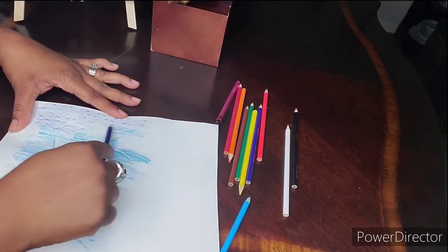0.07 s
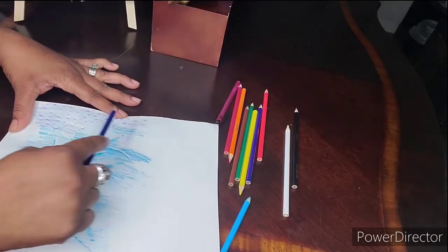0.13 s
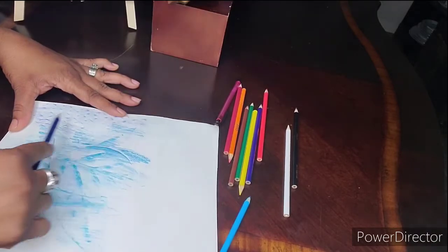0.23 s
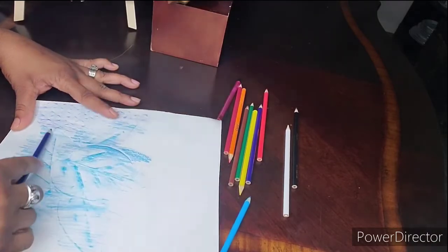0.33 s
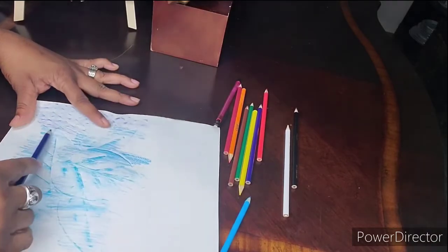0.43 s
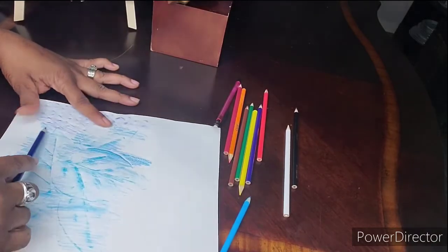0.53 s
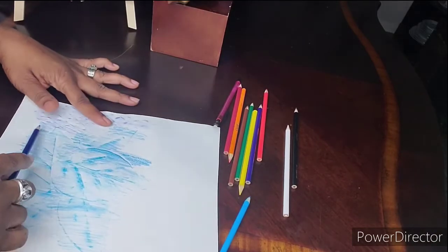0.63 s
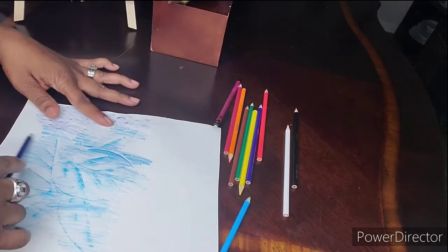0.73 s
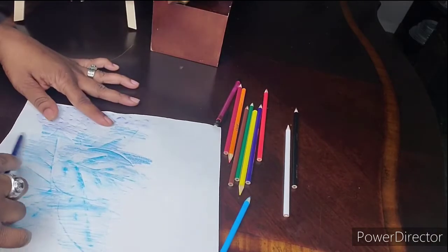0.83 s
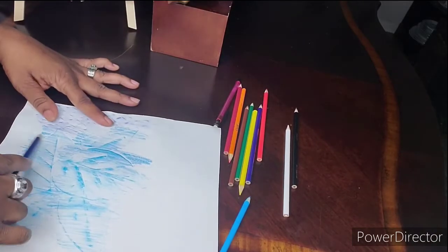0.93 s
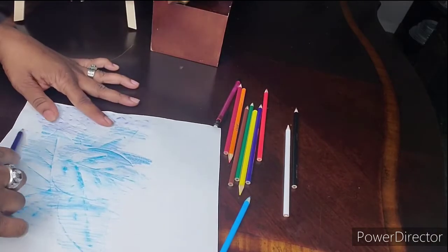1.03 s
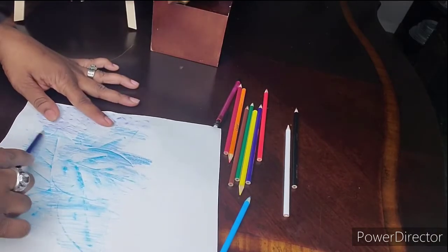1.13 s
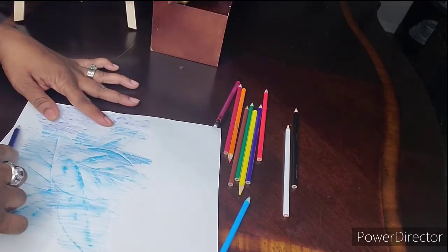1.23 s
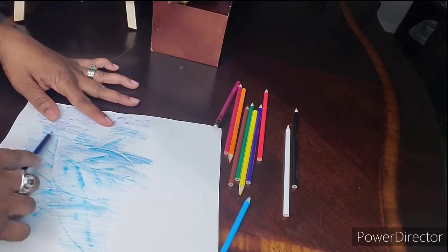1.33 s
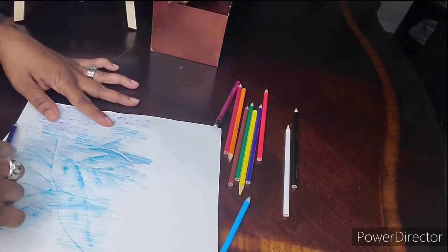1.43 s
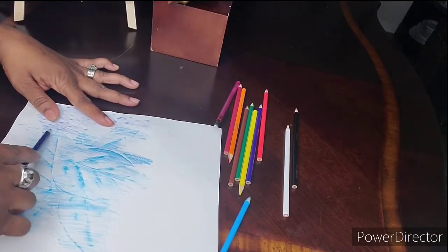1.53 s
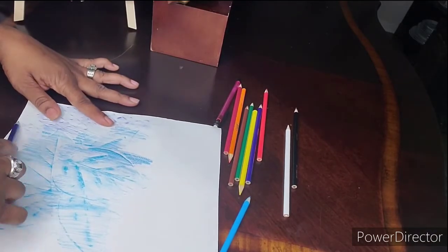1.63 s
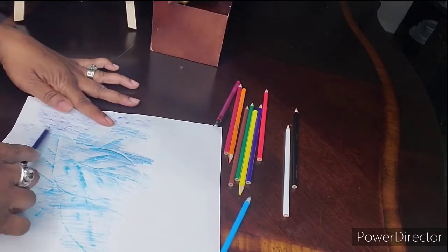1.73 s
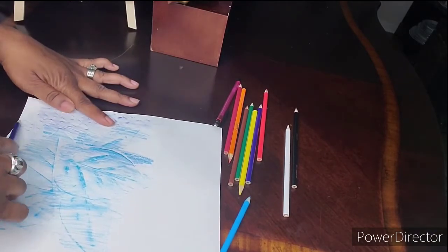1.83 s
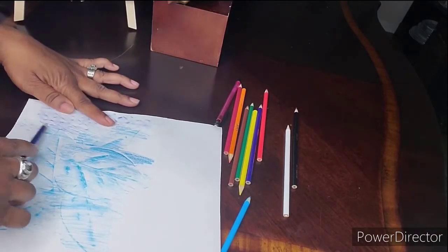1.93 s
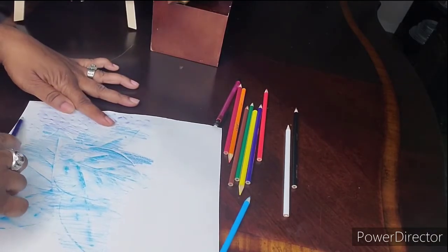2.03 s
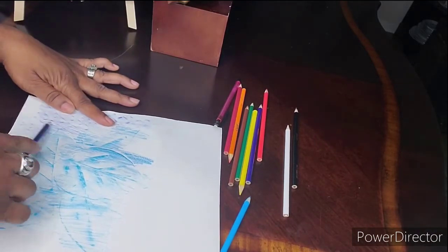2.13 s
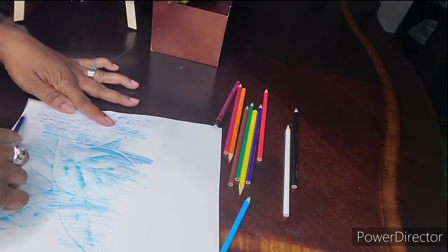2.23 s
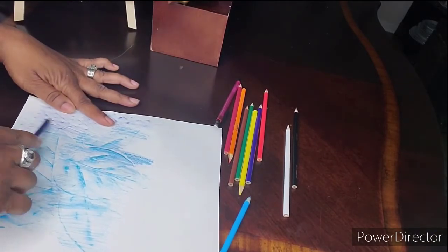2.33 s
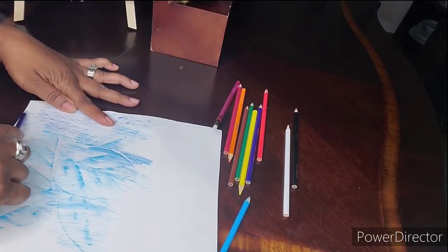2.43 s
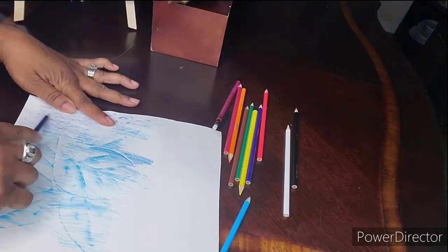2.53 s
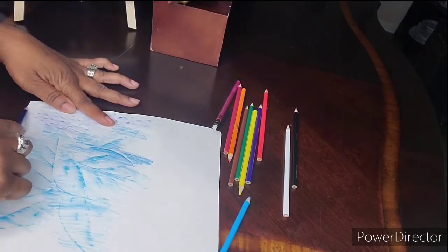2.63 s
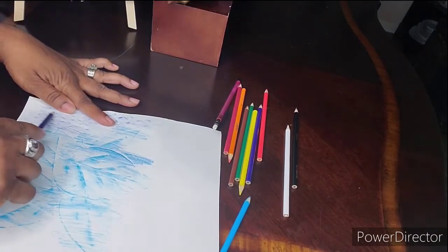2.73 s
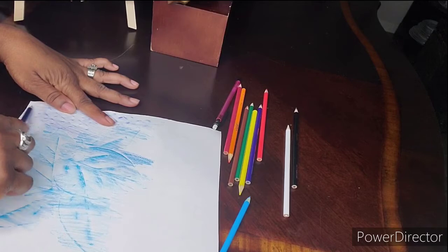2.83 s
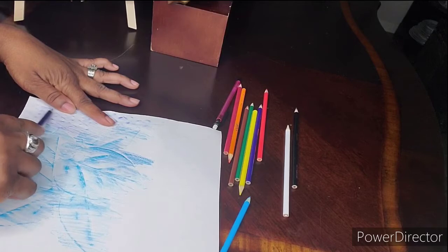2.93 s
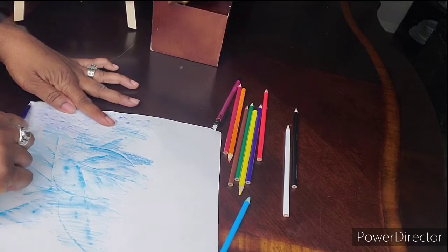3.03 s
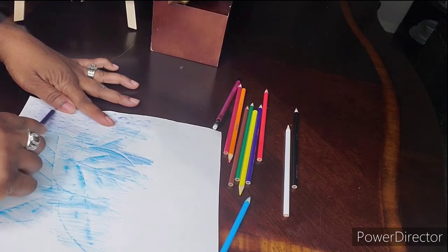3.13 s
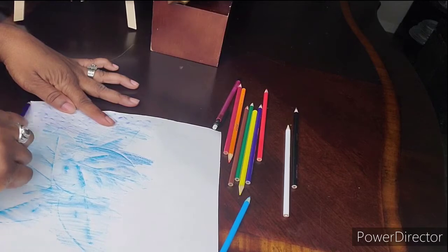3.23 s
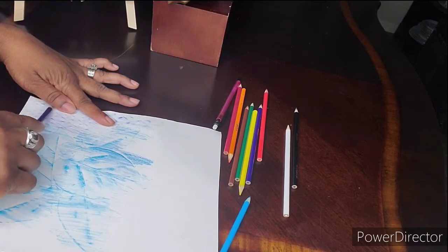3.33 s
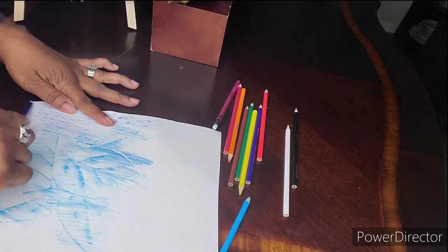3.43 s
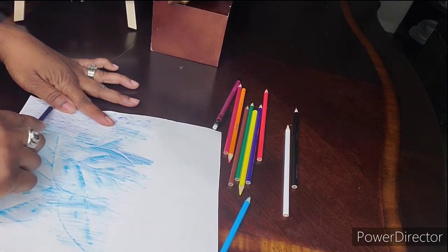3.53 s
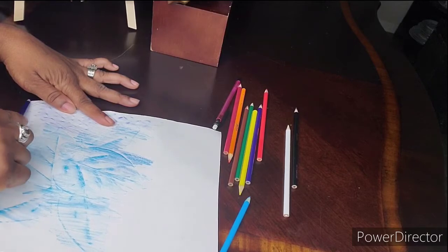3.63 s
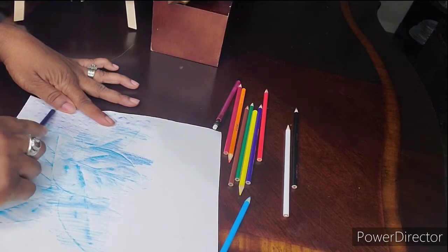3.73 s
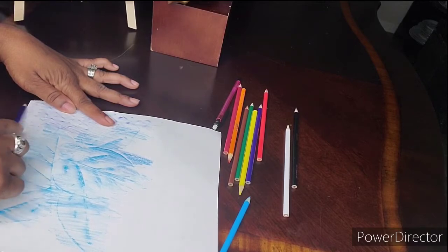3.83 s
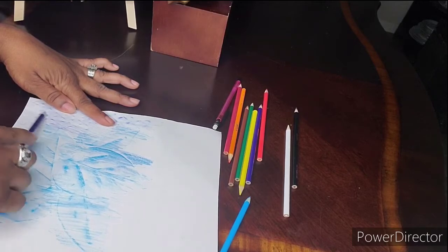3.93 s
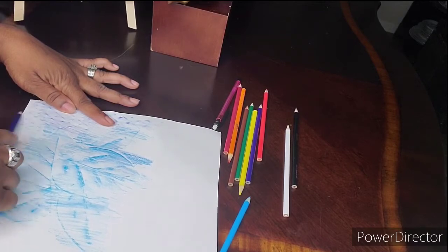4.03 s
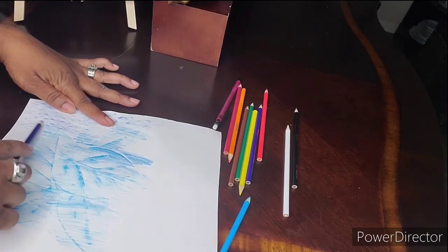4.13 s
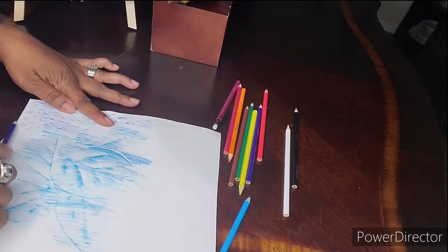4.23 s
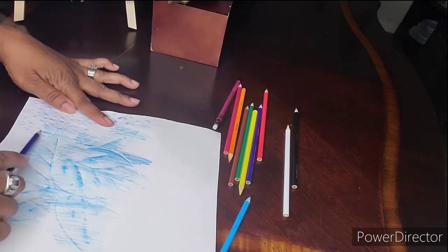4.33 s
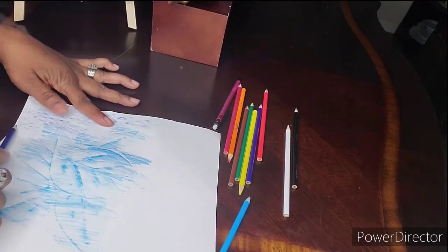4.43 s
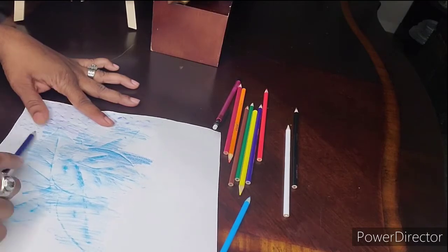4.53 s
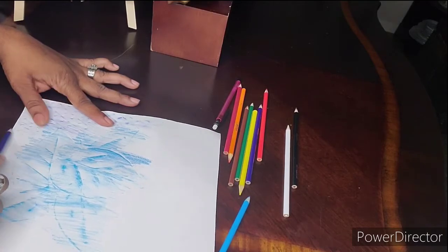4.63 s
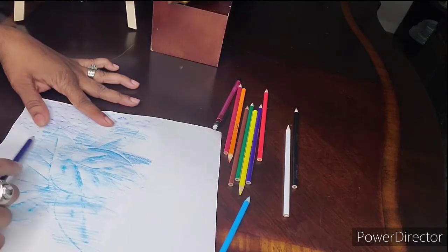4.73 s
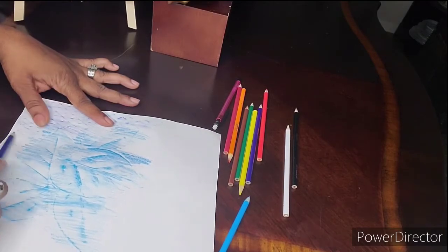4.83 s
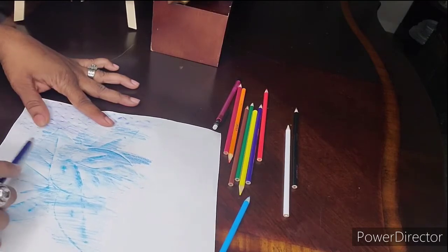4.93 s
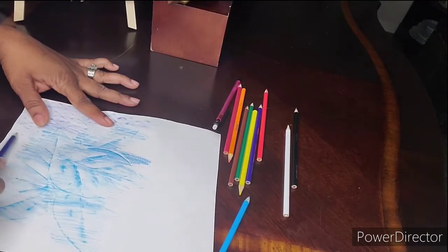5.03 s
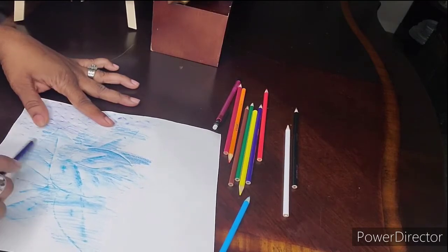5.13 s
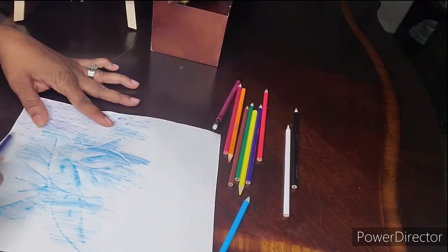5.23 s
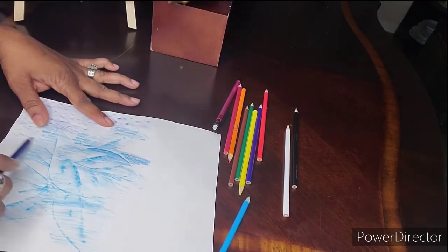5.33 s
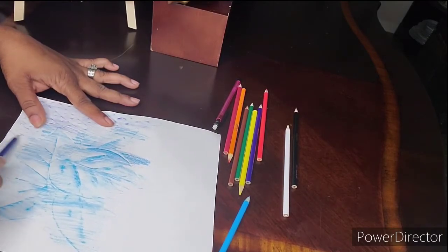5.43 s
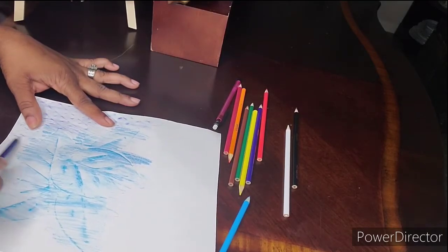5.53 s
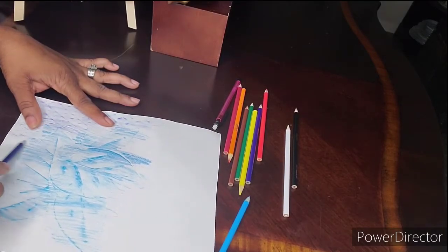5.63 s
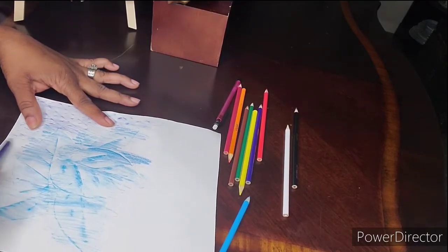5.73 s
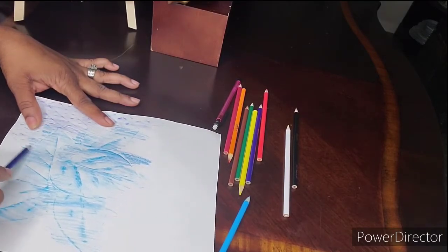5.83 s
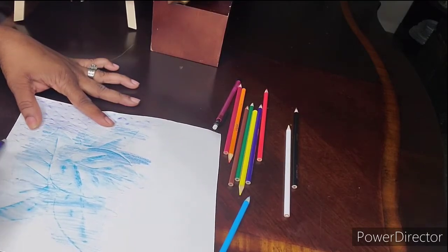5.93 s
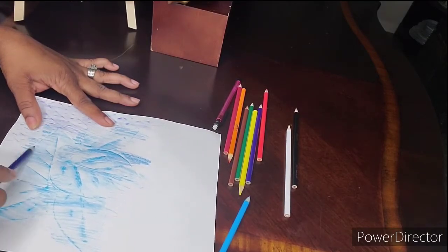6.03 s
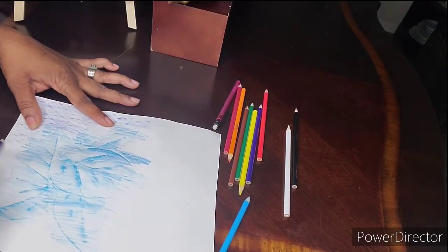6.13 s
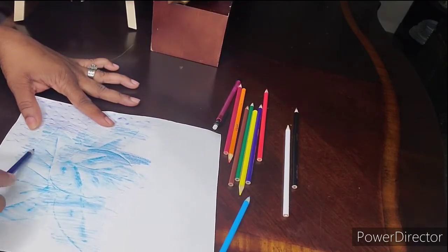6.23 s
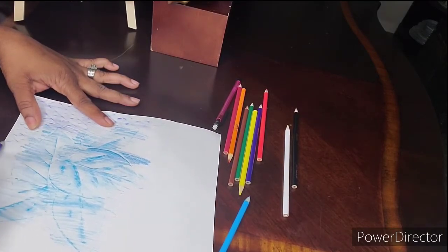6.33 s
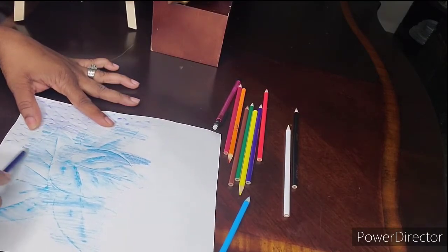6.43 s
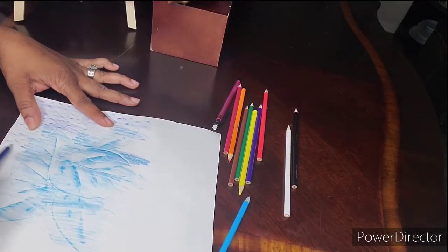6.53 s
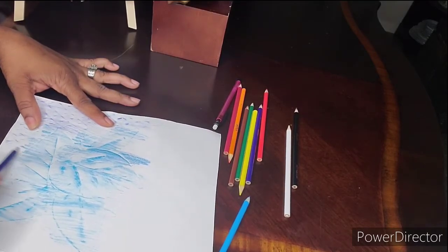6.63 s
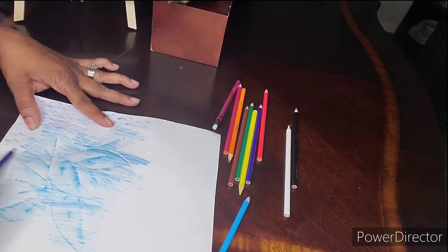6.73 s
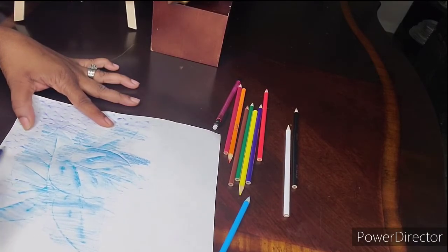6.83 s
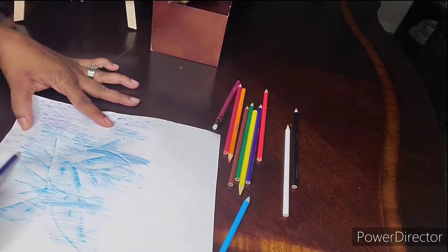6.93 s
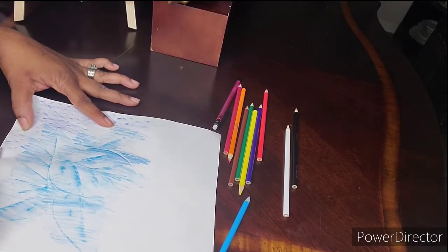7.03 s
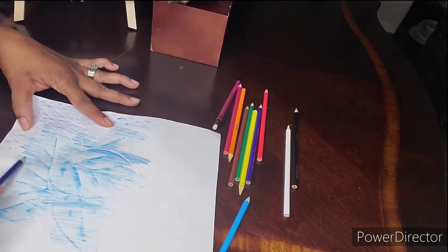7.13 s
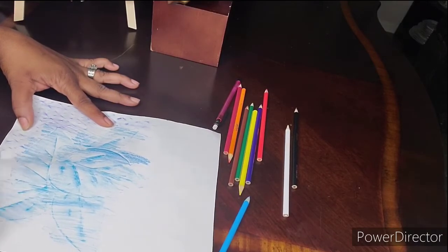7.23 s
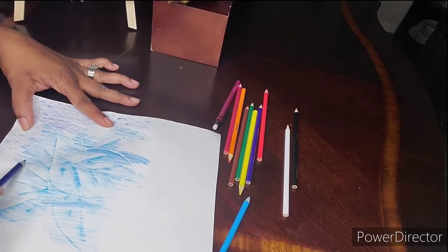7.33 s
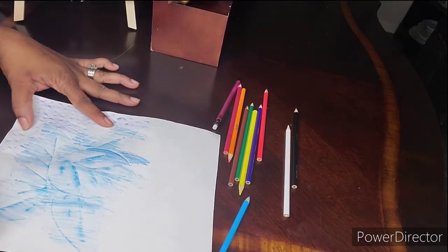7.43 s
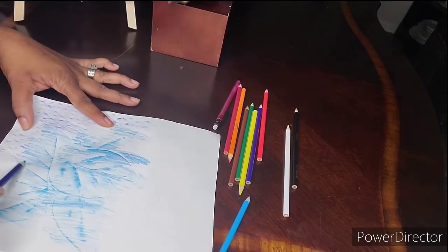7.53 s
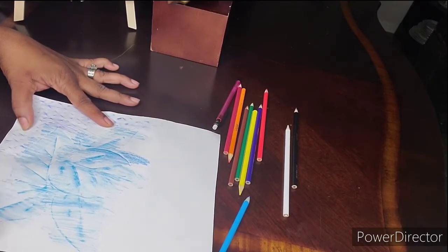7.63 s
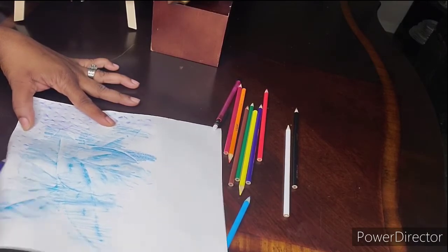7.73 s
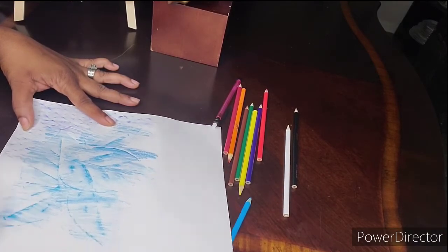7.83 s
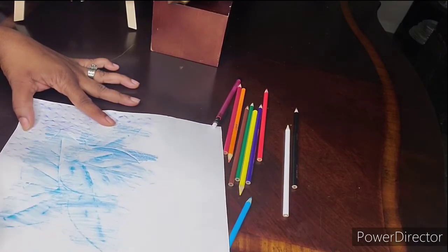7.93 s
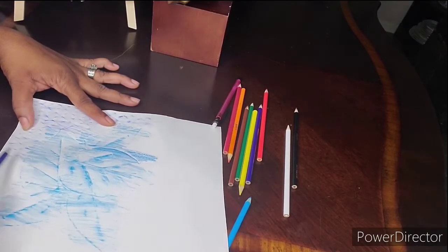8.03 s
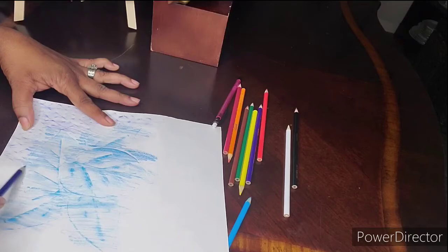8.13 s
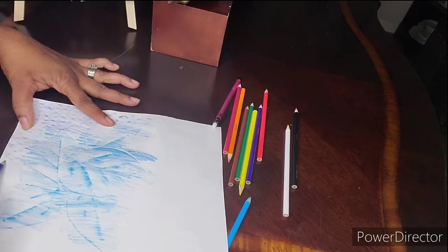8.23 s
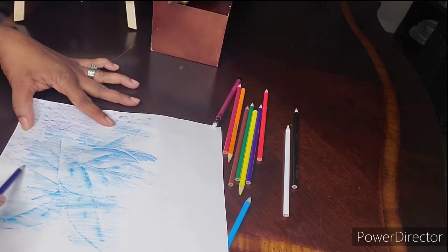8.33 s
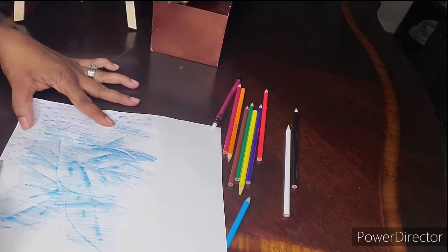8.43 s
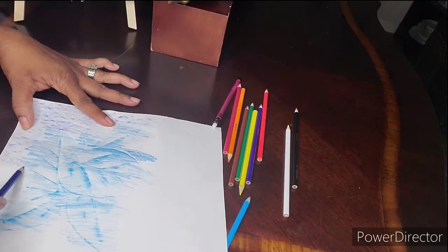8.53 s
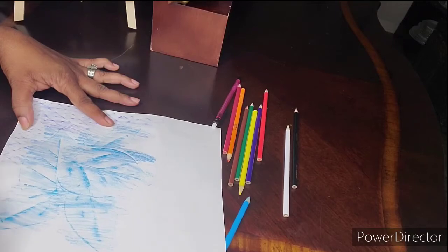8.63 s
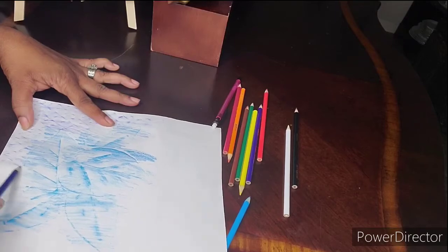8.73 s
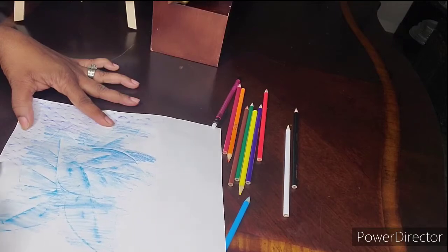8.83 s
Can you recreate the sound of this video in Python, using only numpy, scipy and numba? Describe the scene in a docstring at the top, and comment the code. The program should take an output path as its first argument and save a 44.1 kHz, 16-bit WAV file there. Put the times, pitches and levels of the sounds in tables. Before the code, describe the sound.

In a small quiet room with barely audible air noise, close stereo microphones catch a colored pencil on paper over a wooden desk. From 0 to 0.25 s come abrupt dry scratches and sharp snaps, the strongest near 0.2 s, with a papery scrape and soft bump. Faint searching touches follow until about 0.9 s. Light shading then begins and firms up by 1.5 s into steady back-and-forth rubbing, roughly five full swings or ten strokes each second, pushes mostly louder than returns. Bright gritty hiss sits over midrange sheet rustle and muted desk patter; irregular ticks snap as the lead crosses ridges, especially from 2 to 4.3 s and after 5.6 s. Around 7.9 to 8.05 s the rhythm breaks with hollow paper scrapes and a strong snap. After a brief lull and small scrapes, softer strokes resume near 8.3 s, growing until the end.

```python
"""A few scratches and sharp snaps, then a coloured pencil shades back and forth, about ten strokes a second.
The paper lies on a ridged surface on a wooden desk: the lead rubs over the grain and snaps over ridges.
Noise-like slips, crackle and jolts drive three resonant parts: hissing tip, rustling sheet and knocking desk.
The sheet also flexes in short hollow scrapes and the hand bumps the desk.
Two microphone ports pick it all up in a small quiet room with faint air noise."""
import sys
import numpy as np
from scipy import signal
from scipy.fft import rfft, irfft
from scipy.io import wavfile
from scipy.ndimage import uniform_filter1d, map_coordinates
from numba import njit

SR = 44100
rng = np.random.default_rng(int(sys.argv[2]) if len(sys.argv) > 2 else 0)


def master(y):
    """Save y as 16-bit WAV."""
    cut = np.clip(np.atleast_2d(y).T, -1, 1)
    pcm = np.round(cut * 32767)  # scale
    wavfile.write(sys.argv[1], SR, pcm.astype(np.int16))


N = 391608
TIME = np.arange(N) / SR

# lead striking a ridge or landing: (time [s], tip level [dB], sheet level [dB], desk level [dB])
RIDGE_SNAPS = [(0.0738, -57, -43, -68), (0.086, -49, -39.5, -48), (0.162, -39, -34, -66),
               (.179, -53, -42, -66), (0.1929, -31, -26, -63), (0.4762, -42, -56, -49.5),
               (0.4827, -44, -44, -62), (0.633, -34, -41, -48), (0.882, -40.5, -43, -59),
               (1.1643, -40, -47, -72), (1.191, -43, -50, -57), (1.2513, -34.5, -46, -59),
               (1.463, -38, -42, -74), (1.7845, -38, -58, -66), (1.8058, -52, -40.5, -51),
               (2.0619, -38, -46, -51), (2.1313, -29, -36.5, -43.5), (2.138, -37.5, -59, -75),
               (2.1765, -34, -39.5, -46), (2.192, -32, -58, -73), (2.2704, -43, -41, -67),
               (2.2968, -31.5, -46, -73), (2.3124, -30.5, -37, -44.5), (2.4168, -33, -42, -47),
               (2.419, -26.5, -44.5, -51), (2.598, -36, -51, -68), (2.6116, -27.5, -33.5, -45),
               (2.791, -36.5, -38, -46), (2.807, -41, -55, -43), (2.876, -33, -50, -71),
               (2.9799, -38, -45, -73), (3.004, -48, -39, -47.5), (3.098, -39, -60, -78),
               (3.1666, -33, -55, -51), (3.181, -30, -47, -64), (3.2012, -51, -42.5, -50.5),
               (3.278, -44, -50, -67), (3.395, -51, -35.5, -43), (3.552, -38, -48, -53),
               (3.594, -37, -42, -44), (3.651, -32, -56, -74), (3.8434, -37, -49, -58),
               (3.851, -31, -54, -56), (3.8589, -29, -43, -45.5), (3.975, -36, -63, -67),
               (3.9936, -36, -50, -51), (4.052, -42, -58, -54), (4.076, -37, -47, -66),
               (4.112, -41, -53, -72), (4.199, -31, -33.5, -44), (4.306, -36.5, -40.5, -67),
               (4.389, -40, -50, -74), (4.8369, -27, -37.5, -43.5), (5.03, -50, -48, -71),
               (5.2348, -36.5, -62, -51), (5.429, -40.5, -50, -74), (5.6588, -46, -41, -54),
               (5.67, -31.5, -31, -37.5), (5.8906, -28.5, -32.5, -58), (6.1015, -31.5, -38, -47),
               (6.3107, -34.5, -36.5, -48.5), (6.4907, -42, -37, -81), (6.5369, -44, -36.5, -68),
               (6.5432, -37.5, -40, -52.5), (6.711, -48, -43, -60), (6.79, -49, -39.5, -62),
               (6.9498, -35, -37, -49), (6.9816, -32, -35, -49), (7.15, -41.5, -40.5, -79),
               (7.1648, -55, -45, -52), (7.4315, -32.5, -38.5, -52), (7.438, -47, -54, -75),
               (7.4669, -31.5, -33, -48), (7.607, -33.5, -33.5, -77), (7.6325, -51, -36, -53),
               (7.795, -47, -56, -63), (7.8213, -31.5, -31.5, -54), (7.8517, -29.5, -30, -44),
               (7.8565, -28.5, -31.5, -48.5), (7.955, -55, -40, -51.5), (7.991, -33, -58, -64),
               (8.0329, -32.5, -27, -57), (8.4684, -41.5, -50.5, -59), (8.496, -46, -56, -62),
               (8.541, -52, -39, -69), (8.5804, -30.5, -40, -49.5), (8.592, -38, -38.5, -70),
               (8.686, -46, -43, -62)]
# relative colour of each part: (frequency [Hz], level [dB])
TIP_COLOUR = [(3700, -20), (4400, -13.5), (4900, -4.5), (5600, 1), (6400, -1), (7300, 1), (8100, -0.5),
              (9000, -6.5), (10000, -7.5), (11600, -4.5), (13000, -5.5), (14600, -6)]
SHEET_COLOUR = [(700, -33), (950, -34), (1250, -12.5), (1600, -4.5), (2000, -3), (2350, -3.5), (2700, -1.5),
                (3300, -4.5), (4000, -5), (4900, -16)]
DESK_COLOUR = [(55, -8), (100, -6.5), (135, 2.5), (168, -17), (205, 3.5), (270, -4), (350, -2.5), (460, 1),
               (600, -0.5), (820, 4), (1150, 2)]
# the grip changes the pencil's ring: (time [s], lower ring boost [dB], upper ring boost [dB])
GRIP_RINGS = [(0, 2.5, -4.5), (1.0, -1, -6.5), (1.999, -0.5, -4), (2.8, -0.5, -3), (3.6, -4, -3),
              (4.3, -0.5, -5), (5.1, -4.5, -4), (6.2, -3, -5), (7.4, 0, -7.5), (8.8, -1.5, -1)]
RING_LOW_HZ, RING_HIGH_HZ, RING_WIDTH_HZ = 5250, 6800, 1770
# colour difference of the two ports: (frequency [Hz], left minus right [dB])
PORT_COLOUR = [(300, 1), (1300, -2.5), (2200, 0), (3200, 0), (4000, -1), (4800, -10.5), (5600, 0.5),
               (6400, -5.5), (7700, -4.5), (9300, -2.5), (11000, -0.5), (14000, 0.0)]
# relative spectrum of the room's still air: (frequency [Hz], level [dB])
AIR_COLOUR = [(20, -16), (38, 5.5), (55, -5.5), (100, -7), (170, -9), (300, -16.5), (1000, -15),
              (3000, -19), (8000, -30), (15000, -24.5)]
AIR_DB = -73
TOP_HZ = 14500
# sheet sliding and flexing under the hands:
# (loudest time [s], fade [s], centre [Hz], spread [octaves], level [dB])
SHEET_FLEXES = [(0.074, .005, 2050, 0.21, -42), (0.097, 0.016, 3150, 0.09, -46.5),
                (.13, .004, 3320, 0.11, -50), (.18, 0.0078, 3170, .2, -43),
                (.484, 0.0077, 1580, 0.72, -43.5), (.528, 0.0093, 1300, 0.64, -55.5),
                (.612, 0.0074, 1900, 0.55, -53), (0.892, 0.0064, 1720, 1, -50),
                (1.299, 0.006, 1660, 0.37, -54), (6.492, 0.0031, 1950, 0.11, -36.5),
                (7.164, 0.0059, 1960, 0.13, -43), (7.395, 0.0077, 1940, 0.2, -53),
                (7.86, 0.057, 1960, 0.17, -48.5), (7.976, 0.018, 1800, 0.45, -38),
                (7.982, 0.032, 540, 0.48, -50.5), (8.035, 0.025, 640, 0.43, -56),
                (8.034, 0.011, 1730, 0.33, -30.5), (8.32, .015, 455, 0.33, -65),
                (8.163, 0.0014, 3050, .2, -52), (8.296, 0.012, 1830, 0.4, -47.5)]
FLEX_RISE_SHARE = 0.7  # rise time over fade time
# hand bumping the desk: (time [s], level before the common bump gain [dB])
HAND_BUMPS = [(.167, -56), (.184, -54.5), (1.37, -63), (1.801, -62), (2.395, -59), (2.611, -64),
              (2.801, -58), (3.197, -59), (3.385, -64), (3.575, -63), (5.229, -64), (5.666, -76),
              (5.764, -62), (6.059, -73)]
# desk top modes: (frequency [Hz], relative level [dB], t60 [s])
DESK_TOP_MODES = [(169.6, 6, 0.19), (123.6, -5.5, 0.25), (195, -5, 0.12), (321, -10.5, 0.25),
                  (442, -9, 0.13), (883, 10.5, 0.09)]
# resonances of the loose sheet: (frequency [Hz], width [Hz])
LOOSE_SHEET_RINGS = [(930, 81), (1300, 290), (1620, 220), (2030, 450), (2400, 70), (3300, 41)]
# main ring of the slack sheet between pushes, damped by the holding hand: (time [s], boost [dB])
SLACK_SHEET_RING = [(0, 7.5), (1.5, 3), (2.8, 0.5), (4.1, -4), (5.3, 8.5), (7.2, 2), (8.8, 5.5)]
SLACK_HZ, SHEET_WIDTH_HZ = 1980, 143
SHEET_WAVER = 0.011  # share of the pitch
TAUT_DB = 12  # ceiling on the taut sheet's ring boost
# to-and-fro swings of the hand; sheet and desk levels are relative to the tip:
# (start time [s], push level [dB], return level [dB], push sheet level [dB], return sheet level [dB],
#  desk level [dB], treble boost [dB], pencil ring [Hz], sheet ring [Hz], sheet ring boost before the ceiling [dB])
HAND_SWINGS = [(0.872, -49, -48.5, -7, -7, -27, 0.034, 7600, 2050, 2.0),
               (1.091, -46, -53, -3, -3.5, -18, 0.0, 5430, 2100, 4.5),
               (1.302, -47, -47.5, -2.5, -3.5, -13, 1.0, 5730, 1960, 2.8),
               (1.514, -42, -47, -5.5, -5, -17, -0.61, 5700, 1680, 2.6),
               (1.723, -47.5, -49.0, -4, -3, -15, 1.0, 5900, 2180, 7.7),
               (1.929, -44, -47, -3.5, -2.5, -11.5, 0.0, 6150, 1830, 8.9),
               (2.14, -47.0, -48.5, 0.5, 0, -9, -0.12, 5050, 2120, 7.3),
               (2.344, -45.5, -48, -1.5, -1, -10.5, -0.55, 7100, 1760, 10.7),
               (2.542, -43, -48, -1.5, -5.5, -14.5, 0.2, 7400, 1760, 4.5),
               (2.731, -46, -46.5, -2.5, -2, -13.5, 0.5, 7400, 1560, 9.7),
               (2.931, -43, -51, -4.5, -6, -17.5, -1.0, 7200, 2120, 5),
               (3.125, -44.5, -48.0, -3.5, -3.5, -11.5, -1.0, 7650, 1610, 9.3),
               (3.319, -42.5, -45.5, -5, -7.0, -13.5, -0.86, 7280, 1610, 6.7),
               (3.516, -44.5, -50, -5.5, -6.5, -15.5, -0.12, 6460, 1570, 7.9),
               (3.721, -43.5, -44.5, -3.5, -6.0, -12.5, -0.51, 7160, 1590, 7.2),
               (3.91, -42.5, -46.0, -7.5, -6, -15, -2.2, 6460, 1550, 16),
               (4.133, -44, -49, -4.5, -2, -13.5, 0.0, 5800, 1840, 7.3),
               (4.333, -47.5, -49.5, -2.5, -4.5, -15, 0.94, 7210, 2000, 7.0),
               (4.537, -45.5, -51.5, -5.5, -4.0, -20, 0.0, 6750, 1890, 4.6),
               (4.764, -43, -48, -5, -5, -17.5, 0.0, 5600, 2030, 6.5),
               (4.965, -45, -47.5, -4.5, -6, -16, -0.12, 7600, 2070, 11.4),
               (5.169, -45, -50, -3.5, -1.5, -17.5, 0.5, 7600, 2050, 7.7),
               (5.365, -46.5, -48, -1.5, -3, -13.5, -1.0, 7540, 2020, 4.9),
               (5.582, -45, -52.5, -3, -1, -15.5, 0.77, 5640, 1890, 10.2),
               (5.802, -46.5, -47, -1.5, -4.0, -18.5, -0.72, 4900, 2190, 4.8),
               (6.012, -45.5, -51.5, -3.5, -2.5, -14.5, -0.39, 5550, 2040, 11),
               (6.231, -47.5, -49.5, 0, 0, -14.5, 0.71, 5460, 2060, 3.0),
               (6.45, -46, -48.5, -3, -2, -19.5, -0.3, 5470, 1960, 6.9),
               (6.674, -46, -49, -1.5, 0.0, -18.5, -1.0, 5500, 2050, 4.5),
               (6.889, -45.0, -47.5, -4, -2.5, -16, -1.0, 5470, 2040, 10),
               (7.102, -47, -48, -3, -2.0, -15, 0.35, 5360, 1910, 11),
               (7.315, -48, -49.5, -1, -3, -20.5, -1.2, 5500, 1910, 8.5),
               (7.544, -46.5, -51.5, -3, 0, -16, 0.0, 7600, 1890, 8.6),
               (7.76, -42.5, -61.0, -2.5, 3, -19, 0.16, 6200, 2020, 3.9),
               (8.309, -53.5, -53, -5, -5, -24.0, -1.3, 5710, 2110, 3.5),
               (8.522, -50, -52, -2.5, -2, -20, 0.32, 5680, 2250, 6.8),
               (8.732, -45.5, -63.0, -6, -7.0, -20.5, -0.5, 5640, 2050, 3.1)]
LONGEST_SWING_S = 0.221
# the arm pushes, then draws back:
# (start [share of swing], length [share of swing], fastest point [share of stroke], extra desk level [dB])
PUSH = (0.005, 0.55, 0.59, 1.2)
RETURN = (0.51, 0.56, 0.38, -2.1)
# single strokes while the hand finds a new place; sheet and desk levels are relative to the tip:
# (start time [s], length [s], fastest point before limiting [share of length], level [dB],
#  sheet level [dB], desk level [dB])
SINGLE_STROKES = [(0, 0.032, 0.055, -39, 0, -12), (0.034, 0.14, 0.22, -50, 0.5, -9.5),
                  (0.138, 0.097, 0.43, -44, -3, -8), (0.399, 0.11, 0.26, -65, 2.5, -3.5),
                  (0.464, 0.12, 0.092, -59.5, 0, -1), (0.562, 0.22, 0.18, -61, -1, -8.5),
                  (0.776, 0.11, 1, -59.5, -2.5, -36), (7.91, 0.12, 0.62, -53, 7.5, -15),
                  (8.003, 0.063, 0.34, -44.5, 0, -22), (8.269, 0.067, 0.08, -63, 3.5, -4.5),
                  (8.847, 0.11, 0.61, -51, 11.5, -6)]
SNAP_PAN_DB, SNAP_PAN_SCATTER_DB = -1.5, 3  # left minus right
PORT_LAG_MS, PORT_DRIFT_MS_PER_S = 0.13, 0.0043
# desk response as the pencil works its way across: (time [s], modes level [dB], hollow note boost [dB])
DESK_SPOT = [(0, -10, 0), (1.2, 1, 0), (2.3, -3, -0.5), (3.2, 2, -3), (4.2, -6.5, -2.5), (5.6, 1.5, 3.5),
             (6.8, 0, 7.5), (8.0, -6, 7.5), (8.8, 6, 9.5)]
HOLLOW_HZ, HOLLOW_WIDTH_HZ = 397, 35


def undb(db):
    """Decibels to gain."""
    return 10 ** (np.asarray(db) / 20)


def unit(x):
    """Scale to rms 1."""
    return x / np.sqrt(np.mean(x ** 2))


def colour(points, hz):
    """Gain at hz of a (Hz, dB) outline that falls 40 dB per octave faster past its ends."""
    f, db = np.transpose(points)
    octave, knots = np.log2(np.maximum(hz, 1)), np.log2(f)
    outside = np.abs(octave - np.clip(octave, knots[0], knots[-1]))
    return undb(np.interp(octave, knots, db) - 40 * outside)


def body(points, size=4096):
    """Causal, minimum-phase impulse response with that outline and unit energy."""
    gain = colour(points, np.fft.rfftfreq(size, 1 / SR)) + 1e-3
    # folding the cepstrum forward in time gives minimum phase
    cepstrum = irfft(np.log(gain))
    cepstrum[1:size // 2] *= 2
    cepstrum[size // 2 + 1:] = 0
    response = irfft(np.exp(rfft(cepstrum)))
    return response / np.linalg.norm(response)


def ring(x, response):
    """Pass every channel through an impulse response."""
    return signal.fftconvolve(x, np.atleast_2d(response), axes=-1)[:, :N]


def walk(rate):
    """Smooth chance with a spread near 1, changing rate times a second."""
    hold = max(int(SR / rate), 1)
    steps = np.repeat(rng.standard_normal(N // hold + 1), hold)
    return np.sqrt(3 / 2) * uniform_filter1d(steps, hold)[:N]


def pan(db):
    """Left and right gains for a level difference."""
    return undb(np.array([db, -db]) / 2)


def spread_out(common, apart, share):
    """Mix noise common to both ports with noise of each port's own, by share of energy."""
    return np.sqrt(1 - share) * common + np.sqrt(share) * apart


def decay(t, t60):
    """Exponential fade of 60 dB in t60 seconds."""
    return np.exp(-np.log(1000) * t / t60)


def delay(x, ms):
    """Delay by a time that may move."""
    return map_coordinates(x, [np.arange(N) - ms * SR / 1000], order=3)


def ease(control):
    """The hand takes a moment, 1/40 s, to change its hold."""
    return uniform_filter1d(control, SR // 40)


def resonance(x, hz, width_hz):
    """Band-pass with gain 1 at the centre."""
    return signal.lfilter(*signal.iirpeak(hz, hz / width_hz, fs=SR), x)


@njit
def moving_band(x, hz, width_hz):
    """State-variable band-pass with gain 1 at a centre that moves every sample."""
    out = np.empty_like(x)
    for port in range(len(x)):
        band, low = 0., 0.
        for i in range(x.shape[1]):
            g, k = np.tan(np.pi * hz[i] / SR), width_hz / hz[i]
            v = (band + g * (x[port, i] + 1e-18 - low)) / (1 + g * (g + k))
            band, low, out[port, i] = 2 * v - band, low + 2 * g * v, k * v
    return out


def shifting(x, hz, width_hz):
    """A resonance whose centre wanders at random around its pitch."""
    shift_share, shifts_per_s = .027, 10
    centre = hz * (1 + shift_share * walk(shifts_per_s))
    return moving_band(np.ascontiguousarray(x), centre, float(width_hz))


def air(side_db=-8):
    """Faint room rumble and hiss: coloured noise, mostly alike at both ports."""
    spectrum = rfft(rng.standard_normal((2, N))) * colour(AIR_COLOUR, np.fft.rfftfreq(N, 1 / SR))
    mid, side = irfft(spectrum, N)
    return undb(AIR_DB) * unit(mid + undb(side_db) * side * np.array([[1], [-1]]))


def stroke_list():
    """Every stroke as (start, length, fastest point, dB, sheet dB, desk dB): a swing is a push and a return."""
    starts = [row[0] for row in HAND_SWINGS]
    periods = np.minimum(np.diff(starts, append=np.inf), LONGEST_SWING_S)
    shading = []
    for swing, period in zip(HAND_SWINGS, periods):
        start, push_db, return_db, push_sheet_db, return_sheet_db, desk_db = swing[:6]
        halves = ((push_db, push_sheet_db, PUSH), (return_db, return_sheet_db, RETURN))
        for db, sheet_db, (offset, share, fastest, more_desk_db) in halves:
            shading.append((start + offset * period, share * period, fastest,
                            db, sheet_db, desk_db + more_desk_db))
    return shading + list(SINGLE_STROKES)


def strokes(tip_power=1.95, sheet_power=1.38, desk_power=1.77, desk_late=0.14, pan_db=.5):
    """Rubbing strength (part, port, time): each stroke speeds up and slows; the desk peaks later in it."""
    strength = np.zeros((3, N))
    power = np.abs([tip_power, sheet_power, desk_power])[:, None]
    for start, length, fastest, db, sheet_db, desk_db in stroke_list():
        span = slice(*np.searchsorted(TIME, [start, start + length]))
        progress = (TIME[span] - start) / length
        peaks = np.clip(fastest + np.array([0, 0, desk_late]), .05, .95)
        # bend time so that each half-sine peaks at the fastest point
        bent = np.array([np.interp(progress, [0, peak, 1], [0, .5, 1]) for peak in peaks])
        level = undb(db + np.array([0, sheet_db, desk_db]))[:, None]
        strength[:, span] += level * np.abs(np.sin(np.pi * bent)) ** power
    return strength[:, None] * pan(pan_db)[:, None]


def slips(per_s=6000, spread_db=1.5, fibre_db=-7):
    """Tiny slips of the lead on the paper's tooth, a few of them large, over a smooth hiss of fibres."""
    slipping = rng.random(N) < per_s / SR
    sizes = undb(spread_db * np.minimum(rng.exponential(size=N), 4))
    clicks = unit(slipping * sizes * rng.choice([-1, 1], N))
    return unit(clicks + undb(fibre_db) * rng.standard_normal(N))


def soften(x, corner_hz=10500):
    """The waxy lead yields a little, which takes the extreme treble out of a jolt."""
    hz = np.fft.rfftfreq(x.shape[-1], 1 / SR)
    return irfft(rfft(x) / np.sqrt(1 + (hz / corner_hz) ** 4), x.shape[-1])


def crackle():
    """Crumbs of pigment and fibres break under the lead: sparse noise bursts of unequal size."""
    per_s, spread_db, burst_s = 340, 3.4, .00018
    breaking = rng.random(N) < per_s / SR
    sizes = breaking * undb(spread_db * np.minimum(rng.exponential(size=N), 1.3))
    envelope = signal.lfilter([1], [1, -np.exp(-1 / (burst_s * SR))], sizes)
    return unit(soften(envelope * rng.standard_normal(N)))


def grain(tip_spread=0.72, sheet_spread=0.75, desk_spread=0.55, patchy_db=1.16, patches_per_s=200):
    """Rubbing force (part, port, time): slips, partly different at each port, plus crackle, in patches."""
    share = np.clip([tip_spread, sheet_spread, desk_spread], 0, 1)[:, None, None]
    force = spread_out(slips(), np.array([slips(), slips()]), share)
    # share of crackle at tip, sheet and desk
    gritty = np.array([.33, .42, .35])[:, None, None]
    force = spread_out(force, crackle(), gritty)
    # the relief under the sheet presses harder in patches
    return force * unit(undb(patchy_db * walk(patches_per_s)))


def swing_columns():
    """At every sample: time since the swing began, pencil's ring Hz, sheet's ring Hz and dB, treble dB."""
    rows = np.array(HAND_SWINGS)
    now = rows[np.maximum(np.searchsorted(rows[:, 0], TIME) - 1, 0)].T
    return TIME - now[0], now[7], now[8], now[9], now[6]


def pencil_ring(tip, ring_db=3.5, ring_width_hz=450, treble_hz=8800):
    """Two broad rings swell and fade with the grip; each swing has its own narrow ring and treble level."""
    wander_db, wander_per_s = 1.4, 16
    s, *grip_db = np.transpose(GRIP_RINGS)
    out = tip
    for hz, db in zip((RING_LOW_HZ, RING_HIGH_HZ), grip_db):
        boost_db = np.interp(TIME, s, db) + wander_db * walk(wander_per_s)
        out = out + (undb(boost_db) - 1) * shifting(tip, hz, RING_WIDTH_HZ)
    _, ring_hz, _, _, treble_db = swing_columns()
    narrow = moving_band(np.ascontiguousarray(out), ease(ring_hz), float(ring_width_hz))
    out = out + (undb(ring_db) - 1) * narrow
    high_pass = signal.butter(4, min(treble_hz, SR / 3), "high", fs=SR, output="sos")
    treble = signal.sosfiltfilt(high_pass, out)
    return out + (undb(ease(treble_db)) - 1) * treble


def sheet_ring(sheet, ring_db=0):
    """The sheet's resonances waver; each push tightens it to its own note, and it slackens on the return."""
    wander_db, wander_per_s = 2.2, 24
    out = sheet
    for hz, width in LOOSE_SHEET_RINGS:
        out = out + (undb(wander_db * walk(wander_per_s)) - 1) * shifting(sheet, hz, width)
    age, _, push_hz, push_db, _ = swing_columns()
    pushing = (age > 0) & (age < PUSH[1] * LONGEST_SWING_S)
    slack_db = np.interp(TIME, *np.transpose(SLACK_SHEET_RING))
    hz = ease(np.where(pushing, push_hz, SLACK_HZ)) * (1 + SHEET_WAVER * walk(wander_per_s))
    db = ease(np.where(pushing, np.minimum(push_db, TAUT_DB), slack_db))
    main = moving_band(np.ascontiguousarray(sheet), hz, float(SHEET_WIDTH_HZ))
    return out + (undb(db + ring_db) - 1) * main


def desk_patter(desk):
    """The sheet pats the desk in loose lumps; each third-octave band swells and fades on its own."""
    lump_db, lumps_per_s = 3.5, 28
    centres = np.log2(125) + np.arange(11) / 3
    octave = np.log2(np.maximum(np.fft.rfftfreq(N, 1 / SR), 1))
    spectrum = rfft(desk)
    patter = 0
    # overlapping triangular bands that add up to the whole
    for weights in np.eye(len(centres)):
        band = irfft(spectrum * np.interp(octave, centres, weights), N)
        patter = patter + band * unit(undb(lump_db * walk(lumps_per_s)))
    return patter


def desk_ring(size=16000):
    """Impulse response of the desk top: decaying modes, scaled to unit energy."""
    t = TIME[:size]
    response = sum(undb(db) * np.cos(2 * np.pi * hz * t) * decay(t, t60) for hz, db, t60 in DESK_TOP_MODES)
    return response / np.linalg.norm(response)


def desk_top(force, desk_db=-5, desk_ring_db=-13):
    """Dull knock of the desk, its ringing modes and the hollow note, each as strong as the spot allows."""
    s, modes_db, hollow_db = np.transpose(DESK_SPOT)
    knock = ring(force, body(DESK_COLOUR))
    hollow = resonance(knock, HOLLOW_HZ, HOLLOW_WIDTH_HZ)
    knock = knock + (undb(np.interp(TIME, s, hollow_db)) - 1) * hollow
    modes = ring(force * undb(np.interp(TIME, s, modes_db)), desk_ring())
    return undb(desk_db) * knock + undb(desk_ring_db) * modes


def snaps(peak_s=0.0008, width_s=0.00062, scrape_db=-18, scrape_s=0.016, spread=0.38, snap_db=0,
          crack_db=-9, size=1024):
    """Force (part, port, time) of the lead on a ridge: it scrapes up, lets go in a burst and settles."""
    force = np.zeros((3, 2, N + size))
    t = np.abs((np.arange(size) - size // 2) / SR - peak_s)
    shape = np.exp(-.5 * (t / width_s) ** 2) + undb(scrape_db) * np.exp(-t / scrape_s)
    share = np.clip(spread, 0, 1)
    level_span = .003 * SR  # samples of rms-1 sound that hold as much energy as a burst, before softening
    for s, *part_db in RIDGE_SNAPS:
        noise = rng.standard_normal((3, size))
        burst = spread_out(noise[0], noise[1:], share) * shape
        # a sharp release holds all frequencies alike
        burst = irfft(np.exp(1j * np.angle(rfft(burst)))) * np.sqrt(shape)
        burst /= np.linalg.norm(burst, axis=1, keepdims=True)
        # the lead drops off the ridge with a single crack
        burst[:, np.argmin(t)] += undb(crack_db)
        burst = soften(burst * np.sqrt(level_span) / np.linalg.norm(burst, axis=1, keepdims=True))
        sides = pan(SNAP_PAN_DB + SNAP_PAN_SCATTER_DB * rng.standard_normal())
        level = undb(snap_db + np.array(part_db))[:, None, None]
        i = max(int(s * SR) - size // 2, 0)
        force[:, :, i:i + size] += level * sides[:, None] * burst
    return force[:, :, :N]


def flexes(spread=0.77, skirt_db=-24):
    """Short, hollow scrapes of the sheet itself: slips heard through one broad resonance."""
    out = np.zeros((2, N))
    rub = spread_out(slips(), np.array([slips(), slips()]), np.clip(spread, 0, 1))
    for s, fade, hz, octaves, db in SHEET_FLEXES:
        span = slice(*np.searchsorted(TIME, [s - .15, s + .15]))
        t = TIME[span] - s
        off = np.log2(np.maximum(np.fft.rfftfreq(len(t), 1 / SR), 1) / hz) / octaves
        # a bell with wide, faint skirts
        gain = np.exp(-.5 * off ** 2) + undb(skirt_db) / np.sqrt(1 + off ** 2)
        band = irfft(rfft(rub[:, span]) * gain, len(t))
        out[:, span] += undb(db) * unit(band) * np.exp(np.minimum(t / FLEX_RISE_SHARE, -t) / fade)
    return out


def bumps(push_s=0.00036, bump_db=4):
    """Soft blows of the hand: a rounded push sets the modes of the desk ringing, mostly the lowest."""
    blows = np.zeros((1, N))
    for s, db in HAND_BUMPS:
        blows[0, int(s * SR)] += undb(db + bump_db)
    response = desk_ring()
    t = TIME[:len(response)]
    thud = signal.fftconvolve(response, t * np.exp(-t / push_s))
    return ring(blows, thud / np.abs(thud).max())


def hand_echo(x, echo=0.51, lag_ms=0.9, sway_ms=.12):
    """The moving hand reflects the sound to each port a little later, so the comb colour keeps shifting."""
    late = np.array([delay(port, lag_ms + sway_ms * walk(7)) for port in x])
    return (x + echo * late) / np.sqrt(1 + echo ** 2)


def room(x, near_db=-6, near_t60=0.048, late_db=-13, late_t60=0.26, damp_hz=12000, turn=1.73, size=18000):
    """Quick, shifting reflections from things on the desk, then a short tail from the walls."""
    t = TIME[:size]
    noise = rng.standard_normal((3, 2, size))
    near = noise[:2] * decay(t, near_t60) * (t > .0015)
    damped = signal.lfilter(*signal.butter(1, min(damp_hz, SR / 3), fs=SR), noise[2])
    late = damped * decay(t, late_t60) * (t > .008)
    responses = (r / np.linalg.norm(r, axis=1, keepdims=True) for r in (*near, late))
    here, there, walls = (ring(x, response) for response in responses)
    # a wandering angle blends two sets of near reflections
    place = turn * walk(10)
    near_sound = np.cos(place) * here + np.sin(place) * there
    return x + undb(near_db) * near_sound + undb(late_db) * walls


def scene(rub_db=0.01, tip_db=-1.06, sheet_db=-4, flex_db=-1.0):
    """Grain and snaps drive tip, sheet and desk; the sheet flexes and the hand bumps now and then."""
    rubbing = undb(rub_db) * strokes() * grain()
    jolts = snaps()
    force = rubbing + jolts
    tip = ring(force[0], body(TIP_COLOUR))
    sheet = ring(force[1], body(SHEET_COLOUR))
    paper = undb(tip_db) * pencil_ring(tip) + undb(sheet_db) * sheet_ring(sheet)
    paper = paper + undb(flex_db) * flexes()
    desk = desk_top(desk_patter(rubbing[2]) + jolts[2])
    left, right = hand_echo(paper) + desk
    # the left port lags a little more as time goes on
    left = delay(left, PORT_LAG_MS + PORT_DRIFT_MS_PER_S * TIME)
    return room(np.array([left, right])) + bumps() + air()


def record(dry):
    """Each port adds its own colour; an elliptic low-pass cuts the top steeply."""
    hz, db = np.transpose(PORT_COLOUR)
    gains = pan_curve = undb(np.array([[.5], [-.5]]) * np.interp(np.fft.rfftfreq(N, 1 / SR), hz, db))
    coloured = irfft(rfft(dry) * gains, N)
    return signal.sosfilt(signal.ellip(12, .2, 70, TOP_HZ, fs=SR, output="sos"), coloured)


dry = scene()
out = record(dry)
master(out)
```